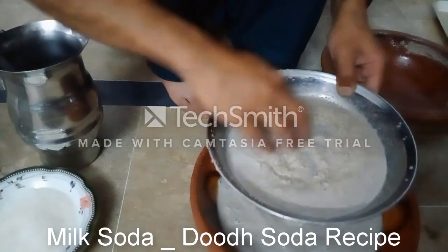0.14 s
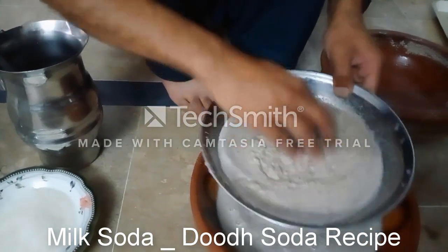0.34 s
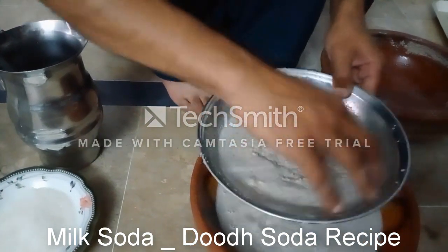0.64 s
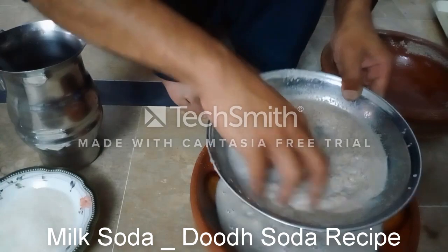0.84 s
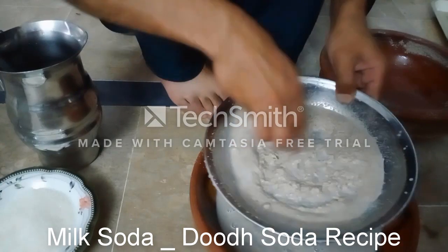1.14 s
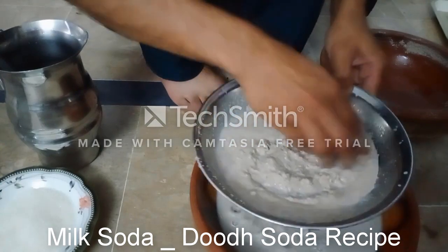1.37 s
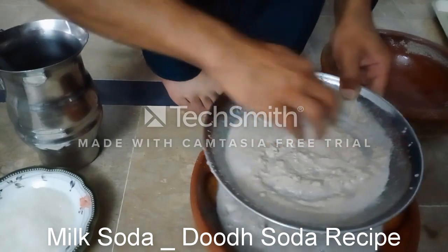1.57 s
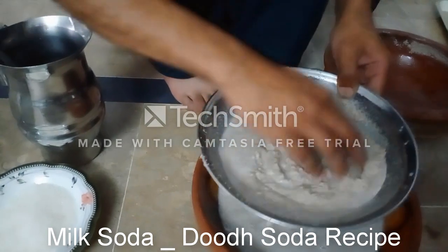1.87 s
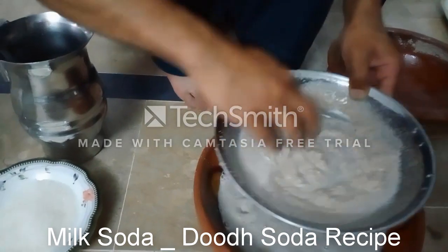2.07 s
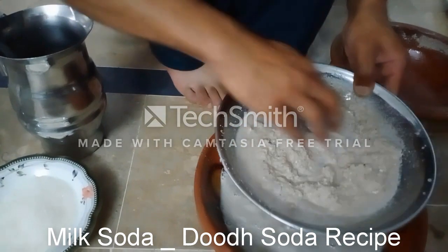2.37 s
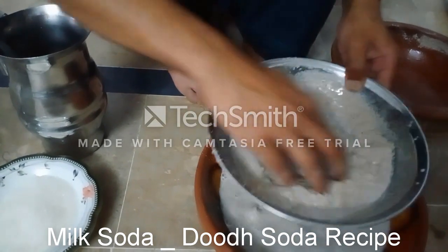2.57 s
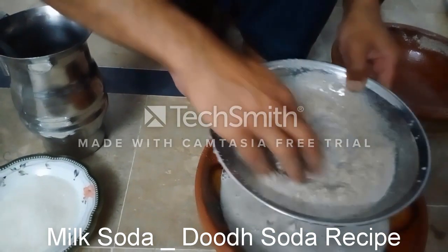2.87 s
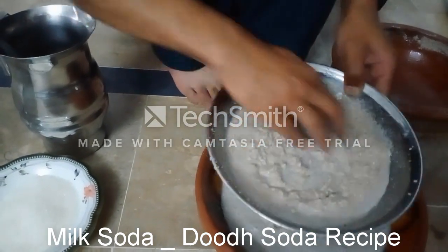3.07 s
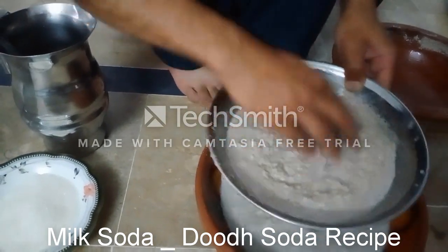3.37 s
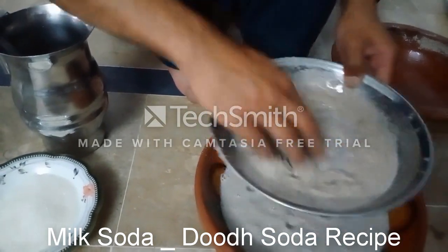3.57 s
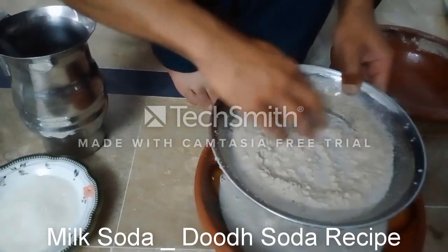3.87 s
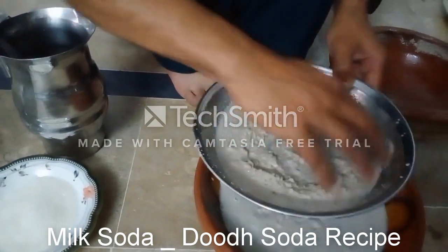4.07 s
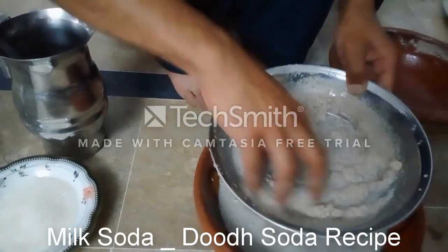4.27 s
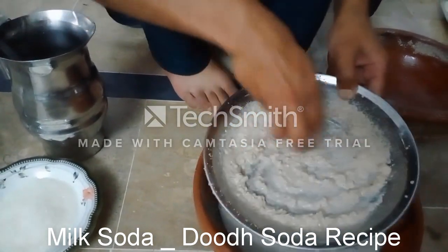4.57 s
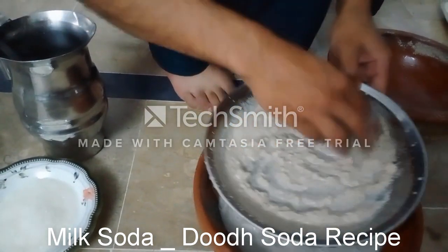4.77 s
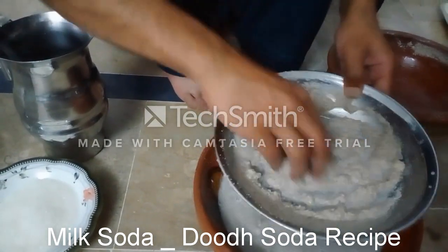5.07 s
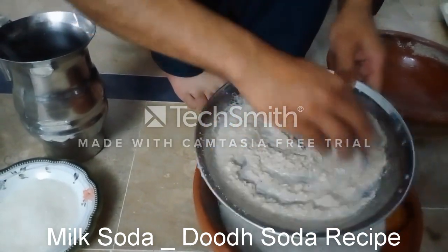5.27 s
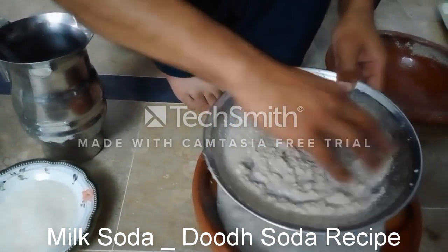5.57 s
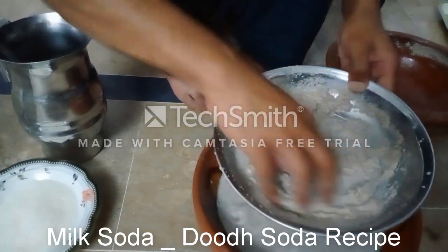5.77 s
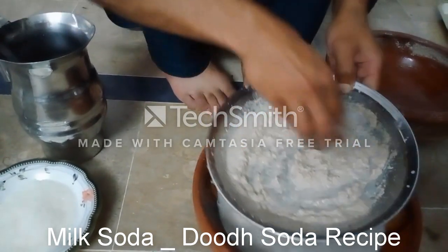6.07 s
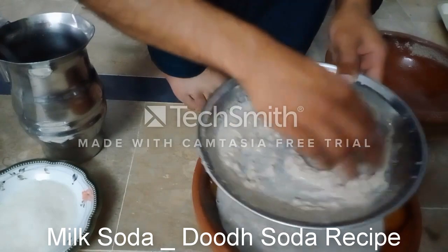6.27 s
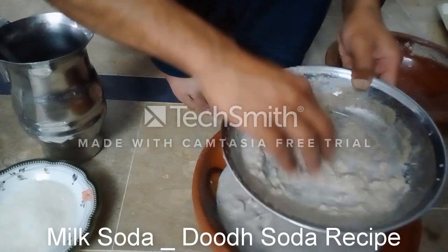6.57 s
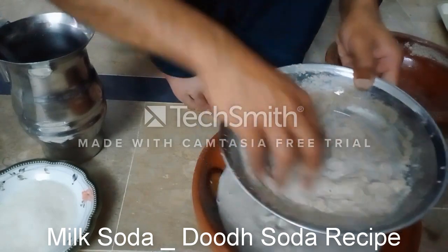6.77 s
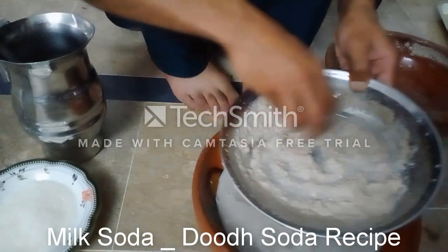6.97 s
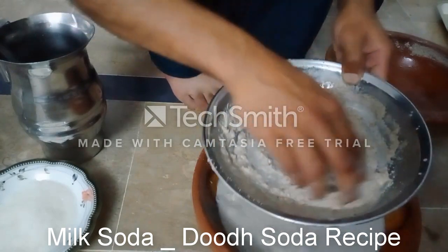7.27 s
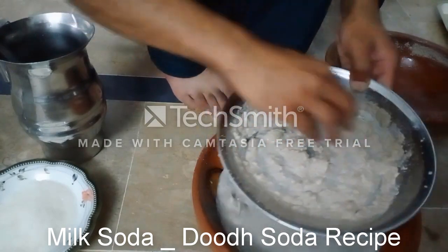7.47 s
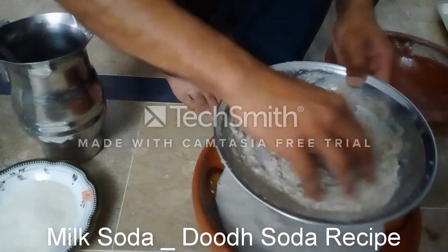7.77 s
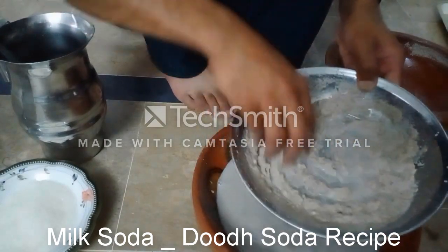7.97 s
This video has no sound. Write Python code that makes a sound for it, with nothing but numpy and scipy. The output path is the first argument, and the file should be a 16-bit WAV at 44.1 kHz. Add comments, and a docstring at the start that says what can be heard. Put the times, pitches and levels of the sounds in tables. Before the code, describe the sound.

A hand rubs wet ground paste around a steel sieve over a clay pot. Irregular strokes, several a second, give gritty scraping and bubbly hiss, with tiny sharp ticks and plinking drops. Later strokes grow stronger, with a hollow metallic drone from the pan. Close stereo microphone in a small tiled room, short echoes, faint hum.

```python
"""Wet paste rubbed through a sieve

Fingers rub wet paste round a steel sieve over a clay pot, in a small tiled room. Strokes gate filtered noise
and small bubbles: scrape and fizz in the mesh, drone in the pan. Films of paste tick as short high rings;
drops ring as damped sines with pot echoes. A soft bump, room noise and mains hum complete it."""
import sys
import numpy as np
from scipy import signal
from scipy.fft import rfft, irfft, next_fast_len
from scipy.io import wavfile
from scipy.ndimage import uniform_filter1d, map_coordinates

SR = 44100
rng = np.random.default_rng(int(sys.argv[2]) if len(sys.argv) > 2 else 0)


def transcribe(signal):
    """Save signal, clipped to [-1, 1], as a 16-bit WAV file at the path in sys.argv[1]."""
    frames = np.atleast_2d(signal).T
    limited = np.clip(frames, -1, 1)
    pcm = np.round(limited * 32767).astype(np.int16)
    wavfile.write(sys.argv[1], SR, pcm)


N = 358533  # samples

# strokes of the hand: crest_s, rise_s, fall_s, fizz_db, scrape_db, drone_db (layer gains at the crest)
STROKES = [(0, .1, 0.32, -51, -47.5, -63.5), (0.268, 0.34, 0.28, -54, -47.5, -66),
           (.46, 0.031, 0.68, -70, -62, -73.5), (.6, 0.075, 1, -58, -53.5, -81),
           (.91, 0.087, 0.9, -55, -77, -109), (1.06, 0.36, 0.41, -52.5, -46.5, -55),
           (1.35, 0.12, 0.6, -62, -52, -93), (1.63, 0.084, 0.46, -58, -49.5, -64),
           (1.85, 0.65, 0.62, -57.5, -56, -87), (2.08, 0.35, 0.41, -60, -54, -58),
           (2.32, 0.25, 1, -57.5, -53, -65), (2.54, 0.095, 1, -55, -55.5, -94),
           (2.7, 0.63, 1, -78, -54.5, -58.5), (2.869, 0.43, 0.26, -53.5, -51, -81),
           (3.02, 0.17, 0.37, -54, -53, -57), (3.189, 0.15, 0.24, -48.5, -43, -52.5),
           (3.358, 0.21, 0.13, -51.5, -48, -55), (3.588, 0.26, 0.16, -50, -46.5, -57.5),
           (3.739, 0.24, 0.18, -52, -49.5, -65), (4.03, 0.038, 0.15, -52.5, -58.5, -93),
           (4.27, 0.092, 0.45, -57, -76, -71), (4.397, 0.075, 0.51, -49, -44, -45.5),
           (4.6, 0.67, 0.14, -58, -54.5, -86), (4.75, 0.58, 1, -64.5, -90.5, -83),
           (4.95, 0.16, 0.95, -58, -58, -76.5), (5.101, 0.18, 0.21, -47.5, -45, -41.5),
           (5.4, 0.21, 0.17, -58, -65, -93), (5.562, 0.46, 0.55, -68, -83, -77),
           (5.694, 0.092, 0.93, -54.5, -54, -77), (5.927, 0.11, 0.45, -46, -42, -43.5),
           (6.3, 0.18, 0.93, -57.5, -61.5, -82), (6.488, 0.076, 0.073, -50, -52, -47.5),
           (6.762, 0.13, 0.096, -52.5, -57, -69), (6.869, 0.022, 0.3, -50, -47, -55.5),
           (6.96, 0.27, 0.14, -51, -60, -53.5), (7.1, 0.091, 0.42, -89, -87, -63),
           (7.312, 0.12, 1, -56.5, -60, -68), (7.538, 0.12, 0.092, -52, -55, -54.5),
           (7.85, 0.12, 0.17, -51.5, -59, -85), (7.997, 0.12, 0.094, -42.5, -38.5, -44),
           (8.1, 0.22, 0.47, -47.5, -49.5, -60.5)]
# resting hand: gain_db of fizz, scrape, drone
REST_DB = [-80, -88, -84]
SWELL_DB = [32, 43.5, 70]  # drop of fizz, scrape, drone over one rise or fall
CREST_EXPONENT = 1.317
# high sieve modes: pitch_hz, width_hz, level_db
MESH_MODES = [(1208, 44, 8), (1580, 410, -4.5), (1881, 43, 8), (2542, 54, 7.5), (3163, 203, 6.5),
              (3328, 580, 4), (4140, 1160, 1), (4794, 780, -1)]
# colour of the fizz: freq_hz, relative_gain_db
FIZZ_COLOUR = [(2500, -29), (4300, -24), (5300, -6), (5900, -3), (6660, 2.5), (7500, -3), (9900, -23.5),
               (11400, -30), (16000, -65)]
# level of the top treble at a fizz gain of -55 dB, changing slowly over time: time_s, level_db
TOP_TREBLE_LEVEL = [(0, -67.5), (1.1, -78), (1.8, -66), (2.6, -65), (3.8, -76), (5.2, -89), (7.2, -67.5),
                    (8.13, -82)]
PUFF_DB, PUFF_T60_S = -13, 0.034  # fizz let out by a tick: gain against the tick's table level, decay
# snapping paste films: start_s, level_db (before the common trim in ticks), pitch_hz
TICKS = [(0.148, -40, 6000), (0.472, -38, 6200), (0.5175, -33.5, 6600), (0.573, -31, 5230),
         (0.6552, -30, 6900), (0.867, -36.5, 7400), (0.939, -36.5, 7540), (1.035, -28.5, 7000),
         (1.054, -26, 6600), (1.274, -36, 6050), (1.371, -35, 6800), (1.381, -32.5, 7260),
         (1.4336, -31.5, 5200), (1.4548, -29, 6750), (1.5754, -29, 5100), (1.59, -29.5, 6960),
         (1.692, -32, 6940), (1.774, -37, 9800), (1.952, -38.5, 8900), (2.2996, -31, 6760),
         (2.5144, -29, 5720), (2.525, -39, 6700), (2.615, -33.5, 8700), (2.846, -28, 7500),
         (3.217, -35, 6760), (3.5823, -25.5, 5600), (3.906, -33, 5330), (3.922, -24, 6220),
         (4.0026, -31.5, 6500), (4.019, -29.5, 6860), (4.568, -32.5, 6900), (4.577, -44, 6300),
         (5.2873, -22.5, 5470), (5.405, -34, 6700), (5.5515, -41, 6760), (5.678, -34, 6700),
         (6.216, -38.5, 6100), (6.277, -26, 6900), (6.2948, -30.5, 7240), (6.349, -28.5, 6950),
         (6.471, -29, 7840), (6.682, -40.5, 6550), (7.0696, -35, 5330), (7.3618, -28.5, 7100),
         (7.496, -26.5, 6640), (7.721, -41, 6130), (7.88, -35, 6400), (7.945, -27, 5850),
         (7.959, -27, 6840), (7.984, -17, 7300), (7.995, -24, 7500)]
# drops trapping bubbles: start_s, peak_db (main bubble), pitch_hz
DRIPS = [(0.0169, -29.5, 2950), (0.0757, -44, 1347), (0.1762, -31, 3470), (0.2177, -43.5, 1340),
         (0.2427, -38.5, 4480), (0.246, -34, 2765), (0.2632, -33.5, 1070), (0.2752, -36, 1340),
         (0.2958, -36, 2070), (0.4344, -30, 2665), (0.465, -45.5, 2045), (0.5735, -42, 4670),
         (0.618, -43, 1620), (0.6578, -32.5, 4780), (0.7214, -34, 3570), (0.7258, -38, 2010),
         (.8844, -30, 3215), (0.8968, -27.5, 3870), (0.942, -36, 1906), (1.037, -36.5, 3170),
         (1.0425, -28.5, 1090), (1.1259, -37, 1367), (1.1797, -36.5, 2970), (1.198, -38.5, 4180),
         (1.2443, -41, 2016), (1.276, -35.5, 3830), (1.309, -43.5, 2580), (1.3297, -36.5, 1964),
         (1.345, -39, 1525), (1.355, -36, 2860), (1.4528, -31, 2610), (1.454, -39, 1158),
         (1.5247, -39, 4700), (1.577, -29.5, 4610), (1.575, -41, 1510), (1.613, -45, 702),
         (1.616, -47, 1390), (1.638, -41, 2560), (1.674, -45, 2810), (1.6932, -34.5, 3220),
         (1.707, -38, 3800), (1.7399, -38.5, 3430), (1.817, -38.5, 1825), (1.871, -37, 3330),
         (2.022, -51.5, 847), (2.107, -41, 2140), (2.131, -40, 1435), (2.1658, -46, 1286),
         (2.3007, -39, 1148), (2.304, -29, 4180), (2.3516, -45.5, 952), (2.5116, -40.5, 1550),
         (2.5142, -35, 2640), (2.552, -30, 4100), (2.553, -46.5, 1140), (2.8827, -39, 2150),
         (2.9904, -39.5, 1815), (3.083, -39.5, 1450), (3.1682, -31.5, 1239), (3.2417, -32.5, 3260),
         (3.582, -36, 4540), (3.603, -31.5, 3400), (3.91, -38, 4150), (3.9272, -33, 1439),
         (4.005, -40, 1910), (4.0282, -33, 3680), (4.0673, -43, 1814), (4.0956, -33.5, 1213),
         (4.224, -46, 1830), (4.3959, -41, 2080), (4.6801, -43.5, 4120), (4.6931, -47, 1600),
         (4.9355, -43, 2173), (4.998, -43.5, 2480), (5.053, -40.5, 1950), (5.219, -50.5, 1093),
         (5.2867, -40.5, 4800), (5.3814, -40.5, 2386), (5.383, -45.5, 3350), (5.383, -35, 1596),
         (5.425, -37, 1400), (5.4844, -43, 4820), (5.6567, -37.5, 3270), (5.68, -40.5, 1844),
         (5.693, -37, 3800), (5.9261, -36, 1570), (6.0639, -27.5, 2990), (6.0634, -40, 2000),
         (6.078, -36, 2400), (6.1647, -48, 2740), (6.1905, -33, 2940), (6.2752, -34.5, 4440),
         (6.351, -42, 4280), (6.4743, -30.5, 3260), (6.476, -33.5, 2500), (6.6028, -37.5, 1260),
         (6.6096, -42, 3290), (6.636, -45.5, 1264), (6.7523, -43.5, 1610), (6.8782, -33.5, 2045),
         (6.9588, -32.5, 3770), (6.9777, -43.5, 1546), (7.007, -36.5, 4600), (7.012, -39.5, 3230),
         (7.0693, -46, 4960), (7.4113, -26, 3150), (7.6782, -36, 3720), (7.7584, -48.5, 1806),
         (7.9507, -42, 1706), (7.9654, -41, 1305), (7.982, -32.5, 1683), (7.9924, -35.5, 2380),
         (7.997, -39, 620.6), (7.998, -33.5, 1197), (8.078, -43, 3090), (8.104, -37.5, 1980),
         (8.114, -35, 3380)]
POT_DB, POT_DECAY_SCALE = -7, .25  # pot echo: gain, decay time against the walls'
TRICKLE_DB = -12  # against the scrape
# low sieve modes: pitch_hz, width_hz, level_db
PAN_MODES = [(636, 21.4, 12), (807, 126, 9.5), (843, 133, 10.5), (527, 420, -12), (331, 200, -15)]
# sieve bumping the pot, one row: start_s, level_db, pitch_hz, t60_s
THUD = (1.598, -49, 132, .2)
# decay of the walls: freq_hz, t60_s
WALLS = [(500, 0.3), (1300, 0.35), (3500, 0.33), (9000, 0.21)]
# colour of the room at rest: freq_hz, relative_gain_db
HUSH_COLOUR = [(15, -13), (43, -20.5), (115, 0.5), (219, -12.5), (262, -13), (513, -11), (718, -30),
               (1000, -36), (4800, -54), (6700, -1.5), (8000, -20), (9500, -59), (16000, -69)]
# mains hum: pitch_hz, rms_db (centre of a random wander)
HUM = [(100, -74.5), (200, -76)]
# echo that differs between channels: freq_hz, gain_db
APART = [(60, -37), (330, -14), (1200, -22), (6400, -29), (9800, 2), (15000, -18)]
# channel balance: freq_hz, left_minus_right_db
LEAN = [(60, -10), (99, 3), (160, 4.5), (270, 3), (450, 4), (740, 5.5), (1220, 8), (2010, 4), (3330, 5),
        (5500, 4.5), (9080, -14), (15000, 1)]
TOP_HZ = 15900


def stroke(index):
    """Gain of one layer under the moving hand: powers of all strokes add, each swelling to a crest and dying."""
    t = np.arange(0, N + 64, 64) / SR
    power = amp(2 * REST_DB[index])
    for crest_s, rise_s, fall_s, *crest_db in STROKES:
        away = np.where(t < crest_s, (crest_s - t) / rise_s, (t - crest_s) / fall_s)
        gain_db = crest_db[index] - SWELL_DB[index] * away ** CREST_EXPONENT
        power = power + amp(2 * gain_db)
    return np.interp(np.arange(N) / SR, t, np.sqrt(power))


def scrape():
    """Gritty paste dragged over the steel shakes its high modes; small bubbles burst in the wet."""
    grit = patchy(3.5) * amp(3.5 * wobble(60) + 4 * wobble(700))
    crowd = swarm(count=2500, hz=3000, octaves=.6, cycles=4.5, spread_db=3.5, size=700)
    mesh = shaken(MESH_MODES, grit, rate_hz=14, depth_db=2.2, drift=.03)
    return stroke(index=1) * unit(mesh + 0.55 * crowd)


def fizz():
    """Paste squeezed through the mesh: hiss with fine crackle; harder strokes add a brighter spray."""
    crackle = swarm(count=7000, hz=7000, octaves=.6, cycles=2, spread_db=3, size=80)
    grit = filtered(patchy(3) + .5 * crackle, lambda hz: amp(along(FIZZ_COLOUR, hz)))
    spray = filtered(patchy(4) * amp(4 * wobble(25)), lambda hz: 1 / (1 + (9500 / (hz + 1)) ** 8))
    effort, puff = stroke(index=0) / amp(-55), puffs() / amp(-55)
    hiss = amp(-54.5 + 1.27 * wobble(25)) * (effort + puff) * unit(grit)
    spray_db = np.interp(np.arange(N) / SR, *np.transpose(TOP_TREBLE_LEVEL))
    return hiss + amp(spray_db) * (effort ** 2.8 + puff) * unit(spray)


def puffs():
    """Gain of the short fizz that follows each tick: soft onset, exponential decay."""
    s, db, _ = np.transpose(TICKS)
    starts = np.bincount(np.round(s * SR).astype(int), amp(db + PUFF_DB), N)
    t = np.arange(SR // 2) / SR
    decay = amp(-60 * t / PUFF_T60_S) * (1 - np.exp(-t / 0.0012))
    return abs(signal.fftconvolve(starts, decay)[:N])


def ticks():
    """Tiny films of paste snap in the mesh: a short high ring, a broad crack and a weaker second snap."""
    s, db, hz = np.transpose(TICKS)
    g = rng.random((len(s), 2))
    ring = bubbles(s, db, hz, np.full(len(s), 5.), 0.02, size=400)
    crack = bubbles(s, db - 4, 1.11 * hz, np.full(len(s), 1.5), 0, size=100)
    second_s, second_hz = s + .001 + .002 * g[:, 0], hz * (.9 + .2 * g[:, 1])
    second = bubbles(second_s, db - 6, second_hz, np.full(len(s), 6.), 0, size=400)
    return amp(-3.5) * (ring + crack + second)


def drips():
    """Each drop slaps the liquid and traps a bubble; a lesser one roughens its ring; the pot echoes closely."""
    s, db, hz = np.transpose(DRIPS)
    g = rng.standard_normal((len(s), 2))
    cycles = 12 * (hz / 1500) ** -.3
    main = bubbles(s, db, hz, cycles, 0.00084, size=2000)
    lesser_s, lesser_hz = s + .004 * abs(g[:, 0]), hz * (1.04 + .12 * g[:, 1])
    lesser = bubbles(lesser_s, db - 7, lesser_hz, .5 * cycles, .01, size=1200)
    slap = bubbles(s, db - 13, np.full(len(s), 6500.), np.full(len(s), 1.5), 0, size=100)
    drops = main + lesser + slap
    return drops + amp(POT_DB) * room(drops, POT_DECAY_SCALE)


def trickle():
    """Each stroke presses liquid through: many faint drops, gated by the scrape gain."""
    drops = swarm(count=450, hz=2600, octaves=.45, cycles=7, spread_db=2.2, size=1200)
    return amp(TRICKLE_DB) * stroke(index=1) * drops


def drone():
    """Rough friction of the fingers excites the low modes of the sieve pan."""
    rough = patchy(3) * amp(1.6 * wobble(40))
    return stroke(index=2) * shaken(PAN_MODES, rough, rate_hz=9, depth_db=2.2, drift=.05)


def thud():
    """The sieve bumps the pot: one soft low damped sine."""
    start_s, db, hz, t60_s = THUD
    t = np.clip(np.arange(N) / SR - start_s, 0, None)
    return amp(db - 60 * t / t60_s) * np.sin(2 * np.pi * hz * t) * (1 - np.exp(-t / 0.002))


def room(x, scale=1):
    """Echoes only; hand and sieve keep moving, so the echo pattern changes every third of a second."""
    step, wet = SR // 3, np.zeros(N + 2 * SR)
    for at in range(0, N, step):
        piece = signal.fftconvolve(x[at:at + step], tail(scale))
        wet[at:at + len(piece)] += piece
    return wet[:N]


def tail(scale):
    """One random answer of the walls: noise whose frequencies die at their own speeds."""
    hz, t, z = signal.stft(rng.standard_normal(SR // 2), SR, nperseg=256)
    t60_s = scale * along(WALLS, hz)[:, None]
    ring = signal.istft(z * amp(-60 * t / t60_s), SR, nperseg=256)[1]
    return np.pad(ring, (150, 0)) / np.linalg.norm(ring)  # delay in samples


def hush():
    """Steady coloured room noise and mains hum, slightly unsteady in level and phase."""
    t = np.arange(N) / SR
    hum = np.zeros(N)
    for hz, db in HUM:
        level = np.sqrt(2) * amp(db + 2.5 * wobble(21))
        hum += level * np.sin(2 * np.pi * hz * t + 0.51 * wobble(4.1))
    noise = filtered(patchy(3.0), lambda hz: amp(along(HUSH_COLOUR, hz)))
    return hum + amp(-68.0) * unit(noise)


def shaken(modes, rough, rate_hz, depth_db, drift):
    """The wet load shifts: each mode swells, fades and wanders between a lower and a higher pitch; rms 1."""
    out = np.zeros(N)
    for k, (hz, width_hz, db) in enumerate(modes):
        share = np.pi / 4 * (1 + np.tanh(wobble(rate_hz / 2)))  # crossfade angle
        drive = rough * amp(depth_db * wobble(rate_hz)) * np.array([np.cos(share), np.sin(share)])
        pitch = hz * (1 + drift * np.array([[-1], [1]]))

        def peak(f):
            return amp(db) * 1j * f * width_hz / (pitch ** 2 - f * f + 1j * f * width_hz)
        out += (-1) ** k * filtered(drive, peak).sum(axis=0)
    return unit(out)


def bubbles(s, db, hz, cycles, rise, size):
    """Damped sines of peak db, at most size samples: soft start, pitch rising slightly near the surface."""
    turns = np.arange(size) / SR * hz[:, None]
    age = turns / np.clip(cycles, 1, 80)[:, None]  # in decay constants
    glide = 1 + rise * (np.minimum(age, 2) - 1)
    ring = np.sin(2 * np.pi * turns * glide) * np.exp(-age) * (1 - np.exp(-turns / 1.5))
    ring = ring / abs(ring).max(axis=1, keepdims=True)
    at = np.round(s * SR).astype(int)[:, None] + np.arange(size)
    return np.bincount(at.ravel(), (amp(db)[:, None] * ring).ravel(), N + SR)[:N]


def swarm(count, hz, octaves, cycles, spread_db, size):
    """Random small grains of joint rms 1, most faint and a few loud."""
    u, g = rng.random((count, 2)), rng.standard_normal((count, 2))
    pitch = np.clip(hz * 2 ** (octaves * g[:, 0]), 950, 16000)
    db = -spread_db * np.log(u[:, 1] + .01)
    return unit(bubbles(u[:, 0] * N / SR, db, pitch, cycles * np.exp(0.92 * g[:, 1]), 0.0066, size))


def patchy(depth_db):
    """Noise of rms 1 with patches of random gain in time and frequency."""
    z = signal.stft(rng.standard_normal(N), nperseg=256)[2]
    field = uniform_filter1d(rng.standard_normal(z.shape), 4, 0)
    field = uniform_filter1d(field, 8, 1)
    return unit(signal.istft(z * amp(depth_db * unit(field)), nperseg=256)[1][:N])


def wobble(rate_hz):
    """Smooth random curve, rate_hz knots a second."""
    knots = rng.standard_normal(int(N * rate_hz / SR) + 4)
    return map_coordinates(knots, [np.arange(N) * rate_hz / SR])


def filtered(x, response):
    """x through a complex response of frequency in Hz."""
    m = next_fast_len(N + SR // 2)
    return irfft(rfft(x, m) * response(np.fft.rfftfreq(m, 1 / SR)), m)[..., :N]


def along(points, hz):
    """Interpolate (freq_hz, value) points on a log frequency axis."""
    f, v = np.transpose(points)
    return np.interp(np.log(hz + 1), np.log(f + 1), v)


def amp(db):
    """Decibels to amplitude ratio."""
    return 10 ** (np.asarray(db) / 20)


def unit(x):
    """Scale to rms 1."""
    return x / np.sqrt(np.mean(x ** 2) + 1e-20)


def scene():
    """Sources plus room echoes in the middle; a filtered further echo, of opposite sign left and right."""
    hits = drips() + trickle() + ticks() + thud()
    rub, low = scrape(), drone()
    echoes = room(amp(-10.0) * hits + amp(-10.5) * rub + amp(-14.5) * low)
    mid = hits + rub + fizz() + low + echoes + hush()
    side = filtered(room(mid), lambda hz: amp(along(APART, hz)))
    return np.array([mid + side, mid - side])


def record(dry):
    """The two channels differ in colour; nothing is kept above the band limit."""
    def lean(hz):
        tilt = np.tanh(along(LEAN, hz) * np.log(10) / 40)  # dB difference to opposite gain offsets
        return np.array([1 + tilt, 1 - tilt]) * (hz < TOP_HZ)
    return filtered(dry, lean)


dry = scene()
out = record(dry)
transcribe(out)
```